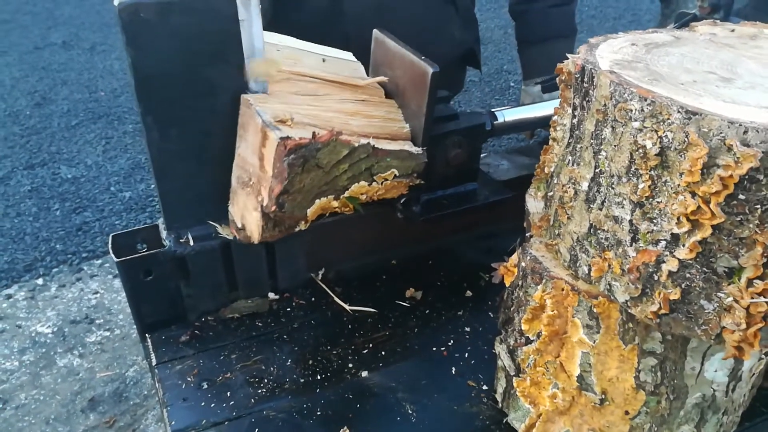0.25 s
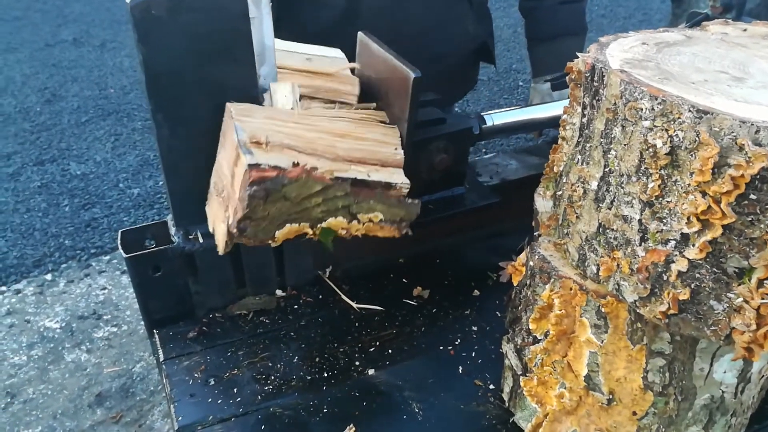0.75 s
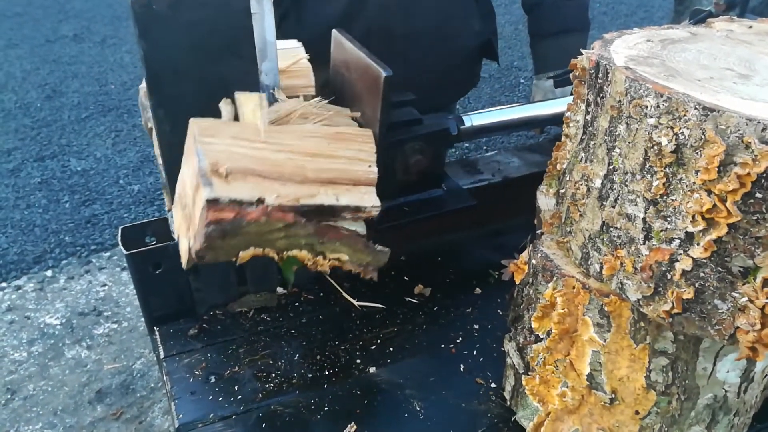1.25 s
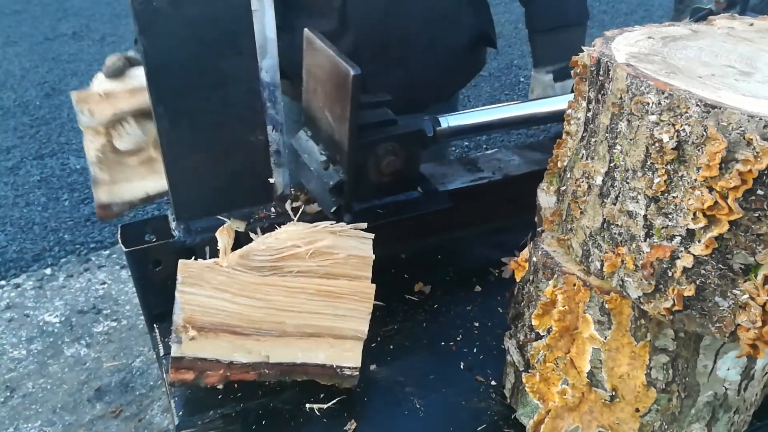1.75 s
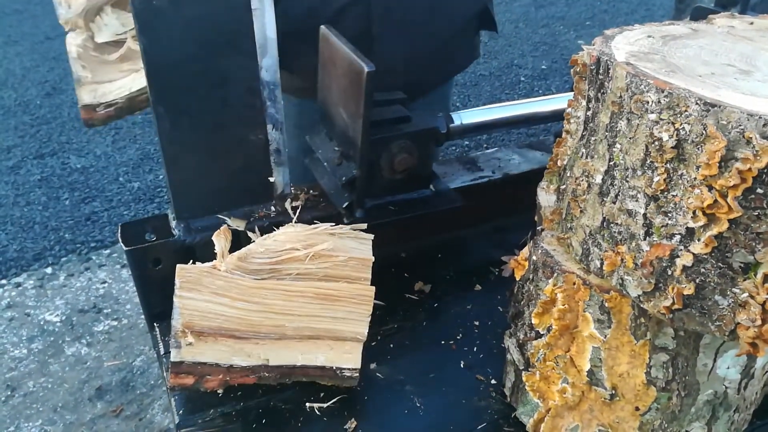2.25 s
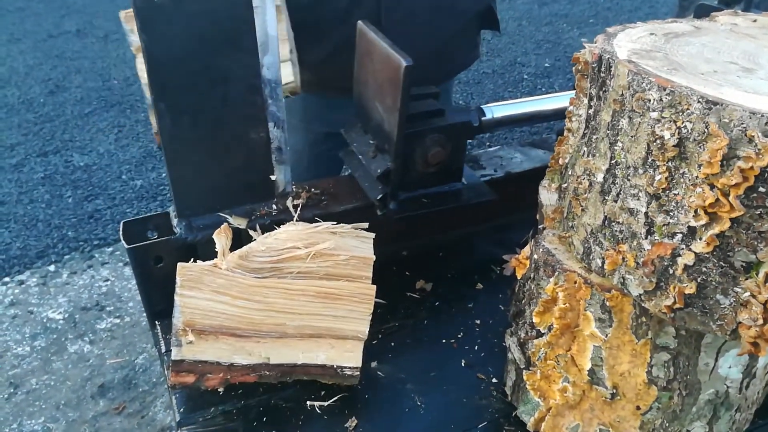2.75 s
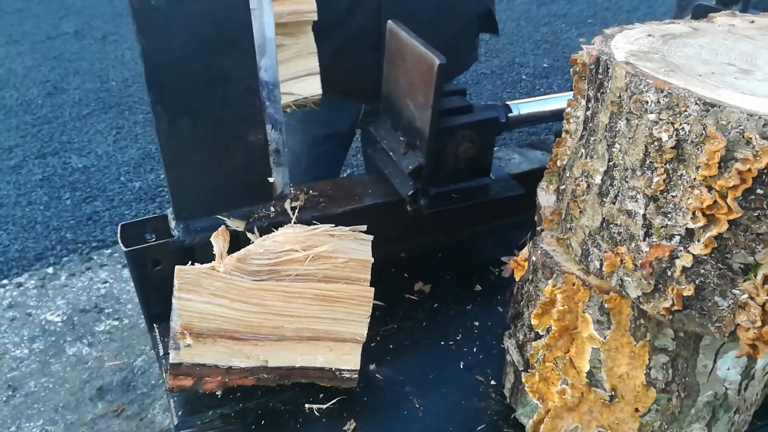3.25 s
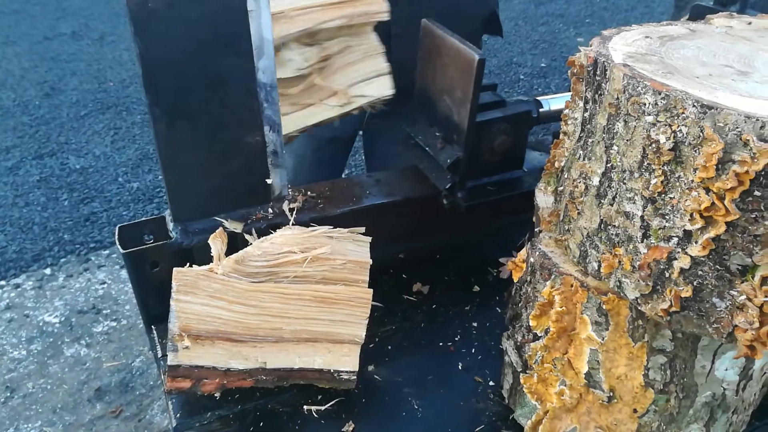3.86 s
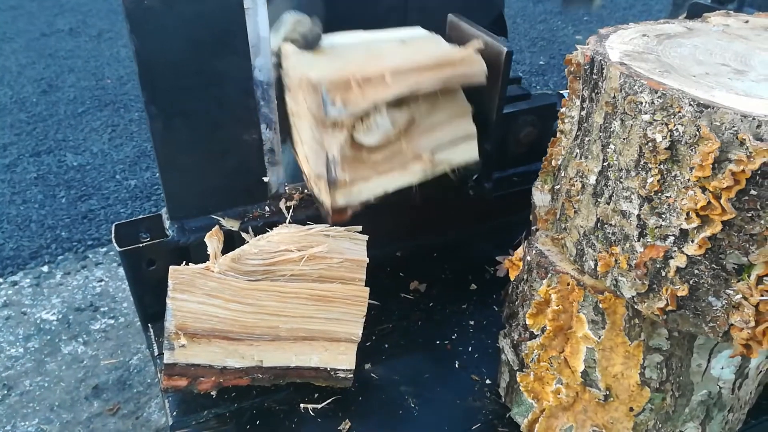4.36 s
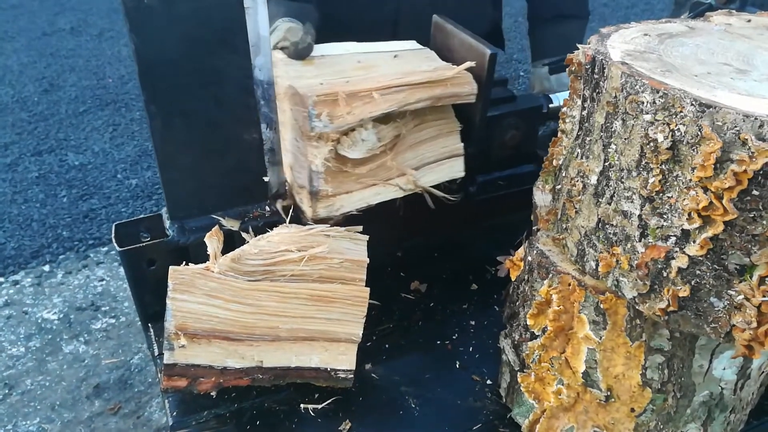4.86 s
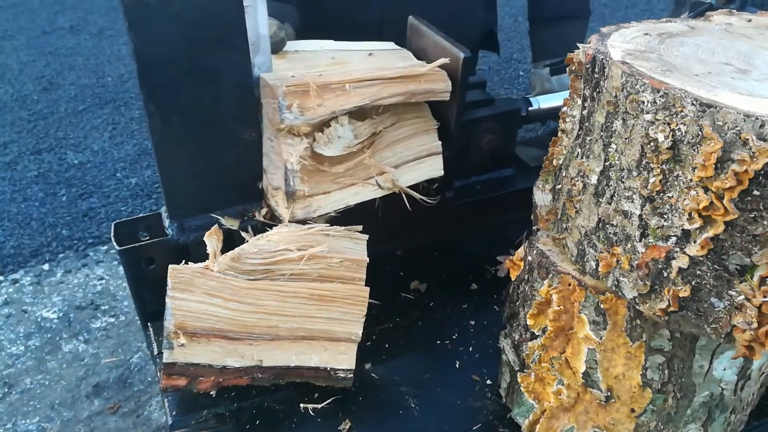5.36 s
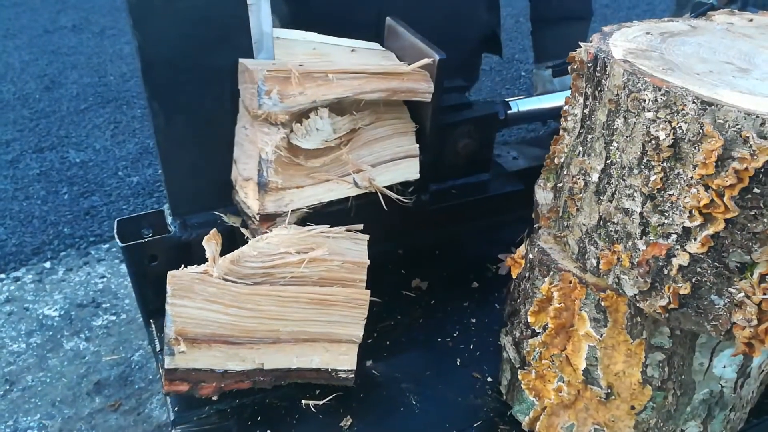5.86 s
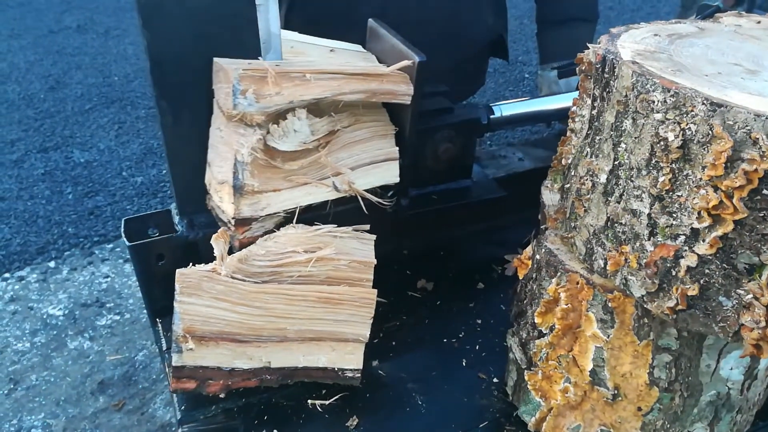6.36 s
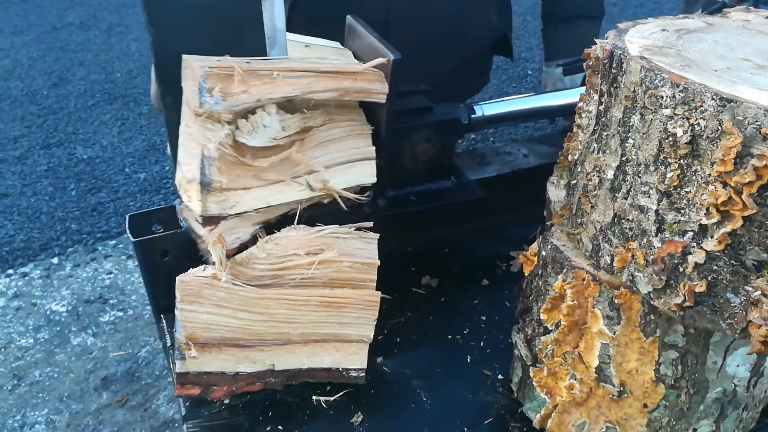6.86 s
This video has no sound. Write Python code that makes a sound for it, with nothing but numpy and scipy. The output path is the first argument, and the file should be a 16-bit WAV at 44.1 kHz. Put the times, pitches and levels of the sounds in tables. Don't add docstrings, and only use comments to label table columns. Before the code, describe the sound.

Close stereo microphone beside a hydraulic log splitter in open air. Constant low engine throb, pump whine and broad hiss underlie everything. Crisp wood cracks and soft frame knocks come first, ending in a low thump. After a few seconds of only machinery, which jumps up in level, the ram hums and the log bursts apart with very loud cracks, followed by thinner, irregular snaps and ticks.

```python
import sys
import numpy as np
from scipy import signal
from scipy.fft import rfft, irfft, next_fast_len
from scipy.io import wavfile
from scipy.ndimage import uniform_filter1d, map_coordinates

SR = 44100
rng = np.random.default_rng(int(sys.argv[2]) if len(sys.argv) > 2 else 0)


def natural_amplitude(level_db):
    exponent = np.asarray(level_db, float) / 20
    return 10 ** exponent


def file_out(sig):
    cols = np.atleast_2d(sig).T
    lim = np.clip(cols, -1, 1)
    pcm = np.round(lim * 32767).astype(np.int16)
    wavfile.write(sys.argv[1], SR, pcm)


N = 312669
RUSH_TOP_HZ = 15750
SIDES = np.array([[.5], [-.5]])

# time in seconds, level in dB, ring in Hz,
# log knock in dB relative to the crack, top fizz in dB relative to the crack.
FIRST_CRACKS = [(0.012, -37, 5500, -19, -7), (.021, -27.5, 5370, -5, -1), (0.101, -38, 4770, -5, -4),
                (0.105, -34, 6000, -12, -9), (.1884, -32.5, 6070, -10, -5), (0.2033, -22, 4740, -7, -15),
                (0.2139, -28, 6430, -13, -12), (.2372, -35, 6050, -5, -1), (0.246, -28.5, 5950, -0.5, -11),
                (0.3116, -30.5, 6050, -5.5, 1), (0.402, -22, 4970, -12.5, -2), (0.437, -40, 4820, -2, -5),
                (0.4681, -23, 5900, -11, -2), (0.473, -25, 6150, -13, 1.5), (0.4815, -29.5, 5400, -9, -3),
                (0.584, -37, 5210, -18, -10), (0.596, -33, 6500, -16, 1), (0.633, -21, 5800, -4.5, -15),
                (0.754, -39, 5760, -30, -12), (0.824, -37, 5830, -19, 1), (.9, -34.5, 5770, -18, -7),
                (0.952, -39, 5500, -19, -7), (1.098, -29, 5900, -11, -7), (1.944, -37.5, 4100, -10.5, -16)]
SPLIT_CRACKS = [(4.882, -36.5, 5850, -4, 0), (4.99, -37, 6040, -13, 5), (5.049, -13.5, 6260, -9.5, -0.5),
                (5.055, -14, 5470, -18, -17), (5.0612, -13, 5760, -9, -16), (5.069, -11, 6240, -18, -11),
                (5.0812, -13.5, 5900, -1.5, -11), (5.0998, -7, 5600, -13, -8), (5.107, -15, 5900, -3.5, -9),
                (5.112, -17, 5660, -13, -6), (5.1283, -11.5, 5500, -5, 0.5), (5.136, -11.5, 5130, -8, -12),
                (5.163, -12.5, 4600, -5, -8), (5.1871, -4, 5700, -12, -7), (5.222, -21, 6080, -6, -5),
                (5.239, -16, 5460, 0, -5), (5.2535, -7, 5000, -9.5, -14), (5.2867, -16, 6070, -0.5, -1.5),
                (5.311, -15, 5250, -4, -10), (5.323, -25, 6600, -15, -2), (5.346, -30, 5900, -2, -2),
                (5.3733, -27.5, 6000, -5, -2), (5.417, -34, 6310, 2, 4), (5.4342, -32, 6000, -10, -6)]
WIDENING_CRACKS = [(5.5144, -23, 5960, -16, -2.5), (5.56, -30.5, 6460, -20, -1),
                   (5.5815, -21.5, 5940, -6.5, 2.5), (5.5887, -25, 5950, -27, 5),
                   (5.604, -15, 5600, -11, 1.5), (5.6194, -17.5, 5400, -10, -3), (5.63, -25, 6060, -13, -6),
                   (5.659, -17.5, 5600, -7.5, -0.5), (5.6708, -27, 5440, -13, -8),
                   (5.706, -36, 5950, -20, 1), (5.753, -27.5, 7340, -26, 1.5),
                   (5.758, -32.5, 5130, -17, -4), (5.889, -31.5, 5810, -17, 0),
                   (5.917, -27.5, 5770, -23, -2), (5.929, -23, 6200, -21, 2), (5.95, -44, 6020, -20, 5),
                   (5.969, -7.5, 6260, -33, -21), (6.0125, -39, 6120, -10, -11),
                   (6.0625, -20, 6200, -24, -8), (6.096, -33.5, 6860, -17, 2), (6.113, -36, 6360, -22, 4)]
LAST_CRACKS = [(6.2655, -44, 6640, -17, 6), (6.2955, -23.5, 6950, -25, -18), (6.3072, -34, 6200, -30, -15),
               (6.327, -34, 5000, -11, -6), (6.357, -34, 4030, -14, -8), (6.364, -24, 6240, -13.5, -8),
               (6.417, -30.5, 6370, -16, -6), (6.42, -28, 6300, -16, -11), (6.463, -34.5, 3973, -11, -10),
               (6.481, -27, 6616, -14, -12), (6.498, -34.5, 5900, -5, -3), (6.559, -32.5, 5410, -12, -4),
               (6.5695, -32.5, 5950, -11, -2), (6.6092, -33, 6910, -9, -3), (6.6227, -34, 6820, -30, -2),
               (6.6562, -34, 5384, -30, -4), (6.6925, -27, 6350, -17, -7), (6.7039, -32, 7490, -30, -15),
               (6.812, -39, 6265, -16, 5), (6.881, -22.5, 6380, -29, -10), (6.9381, -18.5, 6600, -21, -8),
               (6.9512, -33, 3660, -4, 0), (7.0556, -21, 7300, -31, -6), (7.0811, -17, 5000, -31, -11)]
# time in seconds, level in dB, ring in Hz, log knock in relative dB.
SNAPS = [(.172, -39, 7000, -12), (0.27, -39, 5500, -2), (.3005, -38, 6070, -10), (0.3462, -42.5, 3930, 0),
         (.356, -43, 4000, -10), (.391, -38, 6000, -6), (.396, -37, 6300, -15), (.415, -37.5, 5200, -4),
         (.4496, -37, 5200, -18), (.526, -41, 6780, -12), (.554, -43, 4760, -16), (.793, -44, 5660, -5),
         (5.051, -22, 6000, -14), (5.0581, -21, 5970, -6), (5.0715, -26, 6300, -19), (5.087, -31, 6000, -2),
         (5.156, -26, 5400, -20), (5.161, -18, 5400, -13), (5.184, -19, 5400, -14), (5.203, -41, 5000, -8),
         (5.216, -33, 5500, -8), (5.2262, -26, 6000, -3), (5.2305, -26, 5800, -2), (5.292, -26, 7500, -6),
         (5.3267, -28, 6300, -6), (5.409, -36, 6000, -4), (5.479, -41, 6500, -13), (5.556, -36, 6300, -20),
         (5.625, -30, 6000, -15), (5.649, -42, 5200, -15), (6.281, -45, 6000, -20), (6.342, -46, 6000, -20),
         (6.3914, -42, 6330, -20), (6.403, -51, 6500, -20), (6.451, -37, 5800, -7),
         (6.5206, -40, 7500, -20), (6.6438, -41, 6140, -20), (6.7705, -40.5, 6020, -20),
         (6.8434, -41, 6010, -20), (6.9077, -39, 8000, -20), (6.912, -39, 7000, -20),
         (6.946, -38, 5000, -9), (6.979, -35, 7500, -20), (7.0144, -36, 7980, -20), (7.043, -40, 6460, -20),
         (0.602, -40, 7000, -20), (.607, -36, 6500, -7)]
# time in seconds, level in dB, ring in Hz.
TICKS = [(.006, -43, 7000), (.048, -47, 11000), (.088, -43, 6000), (.138, -45, 11000), (.151, -44, 9000),
         (.1995, -38, 11000), (.209, -34, 8000), (.23, -35, 10000), (.2555, -41, 9000), (.325, -39, 8000),
         (0.4652, -25, 10100), (.497, -39, 9000), (.725, -50, 5950), (.858, -42, 6190), (1.11, -43, 5700),
         (1.264, -45, 5180), (5.147, -41, 7000), (5.168, -25, 9000), (5.297, -32, 8000), (5.339, -45, 8000),
         (5.378, -38, 8000), (5.385, -41, 6000), (5.4, -43, 10000), (5.427, -48, 7000), (5.46, -42, 10000),
         (5.484, -44, 10000), (5.503, -41, 6000), (5.5158, -32, 8000), (5.791, -46, 9000),
         (5.849, -51, 13150), (5.8565, -45, 12000), (5.867, -43, 10000), (5.883, -37, 9000),
         (5.8865, -39, 6000), (5.891, -34, 11000), (5.9262, -36, 9000), (5.9325, -30, 10000),
         (5.937, -35, 7000), (5.947, -38, 8000), (5.951, -38, 10000), (5.9707, -16.5, 6130),
         (6.025, -45, 12000), (6.104, -40, 11000), (6.779, -44, 11000), (6.878, -41, 11000),
         (6.884, -37, 6500), (6.94, -33, 6500), (7.055, -25, 13700), (7.0785, -38, 8000),
         (6.176, -47, 9000), (6.332, -34, 6500), (6.384, -44, 7000), (6.458, -41, 10000),
         (6.667, -41, 9000), (6.679, -41, 10000), (6.742, -47, 10000), (6.747, -47, 9000), (3.2, -46, 5100),
         (1.947, -48, 5800), (5.063, -17, 6800)]


def cracks(usual_ms=1.42, usual_hz=5900, thick_lasts=2.03, snap_lasts=1.86, tick_ms=1.47):
    def length_ms(hz):
        return usual_ms * (usual_hz / hz) ** thick_lasts

    snap_fizz_db, tick_knock_db, tick_fizz_db = -4.5, -18, -4
    rows = []
    for s, db, hz, knock_db, fizz_db in FIRST_CRACKS + SPLIT_CRACKS + WIDENING_CRACKS + LAST_CRACKS:
        rows.append((s, db, knock_db, fizz_db, length_ms(hz), hz))
    for s, db, hz, knock_db in SNAPS:
        rows.append((s, db, knock_db, snap_fizz_db, snap_lasts * length_ms(hz), hz))
    for s, db, hz in TICKS:
        rows.append((s, db, tick_knock_db, tick_fizz_db, tick_ms, hz))
    return rows


# frequency in Hz, level in dB.
SPLINTER_SPECTRUM = [(700, -72), (1800, -50), (3000, 6), (4500, 7.5), (5800, 8.5), (7000, 8), (8500, 5),
                     (10500, -35)]
FIZZ_SPECTRUM = [(4000, -75), (7000, -22), (8500, 5.5), (10500, 9), (13000, 0), (16000, 0)]
# time in seconds, ring in Hz.
FACE_RING = [(.02, 1720), (.2, 1790), (.245, 1590), (.4, 1090), (.63, 1870), (1.1, 1310), (5.05, 1450),
             (5.083, 1600), (5.1, 1830), (5.13, 1170), (5.165, 1780), (5.19, 1470), (5.35, 1530),
             (5.58, 1096), (5.62, 1160), (5.66, 1240), (5.97, 2130), (7.09, 1590)]


def splinters(snap_db=-1, tail_db=-24, tail_t60=0.073, knock_t60=0.0079, width=0.49, knock_apart=0.42,
              face_db=2, face_width=0.13, log_db=13):
    size, alike = 2048, 0.55
    rise, hold, drop = 0.1, 1, 1.24
    deep_broadens, usual_knock_db = 0.43, -14
    hiss, push = np.zeros((2, N + SR)), np.zeros((2, N + SR))
    t, f = np.arange(size) / SR, np.fft.rfftfreq(size, 1 / SR)
    rows = cracks()
    chance = rng.standard_normal((len(rows), 3, 3, size))
    broad = natural_amplitude(along(SPLINTER_SPECTRUM, f) - 18.0)
    fizz = causal(natural_amplitude(along(FIZZ_SPECTRUM, f)))
    for (s, db, knock_db, fizz_db, ms, hz), draw in zip(rows, chance):
        start, head = round(s * SR), round(ms / 1000 * SR)
        at = slice(start, start + size)

        noise = np.sqrt(alike) * draw[:, :1] + np.sqrt(1 - alike) * draw[:, 1:]
        progress = t / (ms / 1000)
        tail = natural_amplitude(tail_db - 60 * t / tail_t60)
        burst = np.minimum(progress / rise, 1) * (np.exp(-(progress / hold) ** drop) + tail)
        broader = natural_amplitude(deep_broadens * (knock_db - usual_knock_db))
        ring = causal(np.abs(resonant([(hz, width * hz, 0)])(f)) ** 3 + broad * broader)

        blow = natural_amplitude(-60 * t / knock_t60) * (draw[2, :1] + knock_apart * draw[2, 1:])
        face_hz = np.interp(s, *np.transpose(FACE_RING))
        face = resonant([(face_hz, face_width * face_hz, 0), (1.5 * face_hz, 500, -12)])(f)

        layers = [(noise[0] * burst, ring, db + snap_db),
                  (noise[1] * burst, fizz, db + snap_db + fizz_db),
                  (blow, face, db + knock_db + face_db)]
        for source, colour, level_db in layers:
            part = irfft(evened(source) * colour, size)
            hiss[:, at] += natural_amplitude(level_db) * part / np.sqrt(np.mean(part[:, :head] ** 2))
        push[:, at] += natural_amplitude(db + knock_db) * blow / np.sqrt(np.mean(blow[:, :head] ** 2))
    return hiss[:, :N] + natural_amplitude(log_db) * log_halves(push[:, :N])


# start in seconds, end in seconds, tearing in dB.
PUSHES = [
    (-.1, 1.176, -53.5),
    (4.9, 7.405, -52.5),
]
# time in seconds, level in dB, rise in seconds, fall in seconds.
RIPS = [
    (1.11, -48, 0.0055, 0.042),
    (1.45, -44.5, 0.013, 0.012),
    (5.04, -29, 0.025, .01),
    (5.057, -21.5, 0.0079, 0.063),
    (5.229, -32, 0.0084, 0.0055),
]


def tear_level(around_db=-30, before_s=0.0008, after_s=0.018):
    t = np.arange(0, N, 64) / SR
    swells = [(s, db + around_db, before_s, after_s) for s, db, *_ in cracks()] + RIPS
    power = np.zeros(len(t))
    for s, db, rise, fall in swells:
        distance = np.where(t < s, (s - t) / rise, (t - s) / fall)
        power += natural_amplitude(db) ** 2 * np.exp(-2 * distance)
    for start, end, db in PUSHES:
        power += natural_amplitude(db) ** 2 * np.clip(np.minimum(t - start, end - t) / 0.35, 0, 1) ** 2
    return np.interp(np.arange(N) / SR, t, np.sqrt(power))


def tearing(rate=900, spread_db=10):
    ticks = (rng.random(N) < rate / SR) * natural_amplitude(spread_db * rng.random(N))
    decay = natural_amplitude(-60 * np.arange(600) / SR / 0.016)
    grains = tear_level() * unit(signal.fftconvolve(ticks, decay)[:N])
    noise = pair(SPLINTER_SPECTRUM, [(1000, 0.12)]) + natural_amplitude(-4.5) * pair(FIZZ_SPECTRUM, [(1000, 0.12)])
    fibres = filtered(grains * noise, lambda hz: hz < RUSH_TOP_HZ)
    push = grains * pair([(1000, 0)], [(1000, 0.83)])
    return fibres + natural_amplitude(14.0) * log_halves(push)


# centre in Hz, width in Hz, level in dB.
LOG_MODES = [
    [(1014, 90, 7), (1160, 227, 4)],
    [(1610, 690, 2), (1760, 740, 2.5), (2177, 210, 3.5)],
]
# time in seconds, share of the short half from 0 to 1.
SHORT_SHARE = [(0, 0.8), (5.05, 0.36), (5.14, 0.45), (5.18, 0.64), (5.33, 0.44), (5.55, 0.6), (5.67, 0.1),
               (5.95, 0.8), (7.09, 0.7)]


def log_halves(push):
    share = np.clip(curves(SHORT_SHARE)[0], 0, 1)
    long_half = filtered(push * np.sqrt(1 - share), resonant(LOG_MODES[0]))
    short_half = filtered(push * np.sqrt(share), resonant(LOG_MODES[1]))
    return long_half + short_half


# time in seconds, beam in dB, tray in dB and loose piece in dB relative to the beam.
THUDS = [(.244, -33.5, 15.5, 9), (0.263, -48, -1, 19), (0.267, -44, 5, 11), (.276, -48, 1, 18),
         (0.341, -41, -5, 9), (.322, -23, -6, -10), (0.469, -26, -1, -6), (1.095, -34, -24, 4.5),
         (1.424, -25.5, -8, -25), (1.450, -16, -3.5, 2), (1.475, -34, 1, -20), (1.518, -33, 1.5, -20),
         (5.051, -15, -15, -20), (5.075, -16, 0, -18)]
# centre in Hz, width in Hz, level in dB.
BEAM_MODES = [(161.4, 22, 3), (212, 40, -14.5)]
TRAY_MODES = [(308, 150, -1.5), (468, 43, 4), (780, 990, -4.5)]
BILLET_MODES = [(1130, 170, -1.5), (1650, 290, 0.5)]


def frame():
    beam, tray, wood = np.zeros((3, N))
    for s, db, tray_db, billet_db in THUDS:
        at = round(s * SR)
        steel_at = at + SR // 400
        beam[steel_at] = natural_amplitude(db + 47.0)
        tray[steel_at] = natural_amplitude(db + tray_db + 36.0)
        wood[at] = natural_amplitude(db + billet_db + 31.5)

    def soft(hz):
        return 1 / (1 + 1j * hz / 450) ** 2

    steel = filtered(filtered(beam, resonant(BEAM_MODES)) + filtered(tray, resonant(TRAY_MODES)), soft)
    billet = filtered(wood, lambda hz: resonant(BILLET_MODES)(hz) ** 2)
    return (steel + billet) * natural_amplitude([[1], [-1]])


# time in seconds, pressure from 0 to 1.
PRESSURE = [(0, 0.82), (.6, 0.67), (.9, 0.34), (3.9, 0), (4.5, 0.62), (4.82, 0.63), (4.86, 0.84),
            (5.15, 0.98), (5.58, 0.9), (5.95, 0.82), (6.4, 0.75), (7.09, 0.45)]


def ram(hum_hz=235, pump_hz=177):
    hum_db, hum_span_db, pulse_db, pulse_span_db = -48, 40, -54, 15.5
    slack = 1 - curves(PRESSURE)[0]
    out = 0
    for hz, db in ((hum_hz, hum_db - hum_span_db * slack), (pump_hz, pulse_db - pulse_span_db * slack)):
        turns = np.cumsum(hz * (1 + 0.00072 * wobble(7.4))) / SR
        level = natural_amplitude(db + 6 + 0.76 * wobble(3.8))
        out = out + level * np.sin(2 * np.pi * turns + np.array([[-.35], [.35]]))
    return out


# time in seconds, firing rate in Hz.
SPEED = [(0, 50.2), (.4, 50.4), (.65, 50.63), (1.9, 50.62), (2.2, 50.53), (3.8, 50.53), (4.8, 50.58),
         (5.8, 50.6), (7.09, 50.63)]
# multiple of the engine cycle, level in dB.
FIRING = [(4, -44), (8, -49), (12, -54), (16, -57), (24, -62), (36, -63), (40, -64)]
UNEVEN = [(18, -64), (19, -66), (21, -67), (25, -62), (26, -65), (31, -68), (34, -68), (44, -64), (47, -66),
          (61, -66), (62, -65), (84.92, -63), (92, -63), (93, -61), (94, -65), (104, -60), (122, -64),
          (126, -62), (129, -62), (139, -64)]
PUMP = [(14, -59), (28, -62), (42, -55), (42.93, -62), (56, -63), (70, -69), (112, -61), (168, -62)]
FAN = [(10.74, -52), (12.87, -59), (23.57, -64), (37.18, -64)]
# frequency in Hz, left-right difference in dB.
TONE_PAN_DB = [(100, .5), (260, 2), (430, 2), (470, -3.5), (900, -5), (1170, -2), (2100, -4)]
# frequency in Hz, right lead in rad.
TONE_LEAD_RAD = [(50, 0), (150, .4), (350, 1), (470, 2.3), (1420, 2.5), (1540, 4.6), (2120, 5.6)]
# rate in Hz, depth as a share, phase in rad.
RUNOUT = [(11.53, .4, -.9), (23.06, .25, -1.8), (25.28, .15, 0), (12.64, .08, 1)]
# frequency in Hz, level in dB per Hz.
ROAR_SPECTRUM = [(13, -36), (24, -17), (49, -12), (122, -5), (319, -14), (539, -17), (653, -16), (920, -15),
                 (1070, -7), (1230, -9.5), (1620, -8.5), (2740, -21.5), (5930, -25), (16000, -49.5)]
# frequency in Hz, left-right likeness from 0 to 1.
ROAR_ALIKE = [(60, .998), (150, .97), (400, .85), (900, .6), (2000, .5), (3000, .15), (9000, .05)]
# frequency in Hz, right lead in rad.
ROAR_LEAD_RAD = [(50, 0), (250, .8), (500, 2.3), (1200, 2.6), (2200, 4.5), (4000, 9)]
# frequency in Hz, left-right difference in dB.
MACHINE_EARS_DB = [(300, -0.5), (700, -5), (1300, 1), (2000, -11), (2600, 1.5), (4500, -1), (6000, 7.5),
                   (8000, -9), (11500, -12), (15500, -18)]


def machine(roar_db=-44, tone_db=0, throb=0.077):
    idle_hz, mesh_hz, mesh_db = 50.55, 1061.3, -51
    firing_hz, = curves(SPEED)
    clock = np.cumsum(firing_hz / idle_hz * (1 + .0005 * wobble(8))) / SR
    tones = np.zeros((2, N))
    for multiple, db in FIRING + UNEVEN + PUMP + FAN:
        hz = multiple * idle_hz / 4
        pan_db, lead = along(TONE_PAN_DB, hz), along(TONE_LEAD_RAD, hz)
        unsteady_db = (0.24 + 0.54 * min(hz / 700, 1)) * wobble(11)
        level = natural_amplitude(unsteady_db) * natural_amplitude(db + 1.5 + pan_db * SIDES)
        tones += level * np.sin(2 * np.pi * (hz * clock + rng.random()) - lead * SIDES)

    swell = 1 + sum(depth * np.cos(2 * np.pi * hz * clock + phase) for hz, depth, phase in RUNOUT)
    mesh_level = swell * natural_amplitude(mesh_db - 1.0 + wobble(3.3) - 9.8 * SIDES)
    tones += mesh_level * np.sin(2 * np.pi * mesh_hz * clock - 2.36 * SIDES)

    firing_beat = throb * np.sin(2 * np.pi * idle_hz * clock)
    cycle_beat = 0.04 * np.sin(np.pi / 2 * idle_hz * clock)
    rush = mottled(pair(ROAR_SPECTRUM, ROAR_ALIKE), patchy_db=1.62)
    rush = filtered(rush, lambda hz: np.exp(-1j * SIDES * along(ROAR_LEAD_RAD, hz)))
    rush = rush * (1 + firing_beat + cycle_beat) * natural_amplitude(0.46 * wobble(24))
    rush = filtered(rush, lambda hz: natural_amplitude(along(MACHINE_EARS_DB, hz) * SIDES) * (hz < RUSH_TOP_HZ))
    return natural_amplitude(tone_db) * tones + natural_amplitude(roar_db) * rush


# start in seconds, change in dB, duration in seconds.
GAIN_STEPS = [
    (0, -2.5, 0.76),
    (3.802, 10, 0.098),
    (5.065, -4.5, 0.26),
    (5.25, 0.5, .35),
    (5.944, -2, 0.033),
]


def gain_db(start_db=3.5):
    t = np.arange(N) / SR
    return start_db + sum(db * np.clip((t - s) / took, 0, 1) for s, db, took in GAIN_STEPS)


def ports(x, shading, left_lead=0):
    hz = np.fft.rfftfreq(1024, 1 / SR)
    delay = np.exp(2j * np.pi * hz * (left_lead * SIDES - 8 / SR))
    colour = causal(natural_amplitude(along(shading, hz) * SIDES)) * delay
    return signal.fftconvolve(x, irfft(colour), axes=1)[:, 8:N + 8]


def pair(spectrum, alike):
    def shared_and_apart(hz):
        turn = np.arccos(np.clip(along(alike, hz), -1, 1)) / 2
        return natural_amplitude(along(spectrum, hz)) * [np.cos(turn), np.sin(turn)]

    both, apart = filtered(rng.standard_normal((2, N)), shared_and_apart)
    return unit(np.array([both + apart, both - apart]))


def mottled(x, patchy_db):
    hz, _, z = signal.stft(x, SR, nperseg=512)
    field = uniform_filter1d(rng.standard_normal(z.shape[1:]), 5, 0)
    field = uniform_filter1d(field, 10, 1)
    depth = along([(2300, 1), (3200, .1)], hz)[:, None]
    return signal.istft(z * natural_amplitude(patchy_db * depth * unit(field)), nperseg=512)[1][:, :N]


def resonant(modes):
    def response(f):
        total = 0
        for k, (centre, width, db) in enumerate(modes):
            damping = 1j * f * width
            total = total + (-1) ** k * natural_amplitude(db) * damping / (centre * centre - f * f + damping)
        return total
    return response


def causal(gain):
    cepstrum = irfft(np.log(np.abs(gain) + 1e-6))
    half = cepstrum.shape[-1] // 2
    fold = np.r_[1, np.full(half - 1, 2), 1, np.zeros(half - 1)]
    return np.exp(rfft(cepstrum * fold))


def evened(z):
    spectrum = rfft(z)
    power = np.abs(spectrum.sum(axis=0)) ** 2 + .3 * (np.abs(spectrum) ** 2).sum(axis=0)
    return spectrum * causal(uniform_filter1d(power, size=24) ** -.4)


def filtered(x, response):
    m = next_fast_len(N + 8192)
    return irfft(rfft(x, m) * response(np.fft.rfftfreq(m, 1 / SR)), m)[..., :N]


def wobble(rate):
    coarse = np.arange(0, N + 64, 64)
    knots = rng.standard_normal(int(N * rate / SR) + 4)
    return np.interp(np.arange(N), coarse, map_coordinates(knots, [coarse * rate / SR]))


def curves(rows):
    s, *cols = np.transpose(rows)
    return [np.interp(np.arange(N) / SR, s, c, left=c[0], right=c[-1]) for c in cols]


def along(points, hz):
    f, v = np.transpose(points)
    return np.interp(np.log(hz + 1), np.log(f + 1), v)


def unit(x):
    return x / np.sqrt(np.mean(x ** 2) + 1e-20)


# frequency in Hz, left-right difference in dB.
WOOD_EARS_DB = [(300, 0), (1200, 0), (2000, -3), (3000, 6), (4300, -1), (5600, 9), (6600, 7), (8300, -4),
                (11300, -10), (13000, -4), (15500, -5)]


def scene():
    engine = natural_amplitude(gain_db()) * (machine() + ram())
    wood = ports(splinters() + tearing(), WOOD_EARS_DB, left_lead=2.2 / SR)
    return engine + wood + frame()


def top_cut(x):
    return signal.sosfilt(signal.butter(12, 16470, fs=SR, output="sos"), x)


def record(dry):
    top_hz, slope_db_per_100_hz = 15900, -5
    limited = dry / (1 + np.abs(dry / .93) ** 8) ** (1 / 8)
    mix = filtered(limited, lambda hz: natural_amplitude(slope_db_per_100_hz * np.maximum(hz - top_hz, 0) / 100))
    return top_cut(mix)


dry = scene()
out = record(dry)
file_out(out)
```